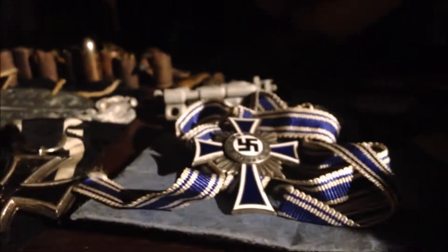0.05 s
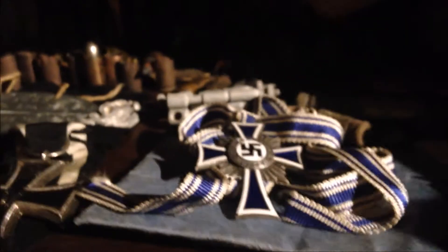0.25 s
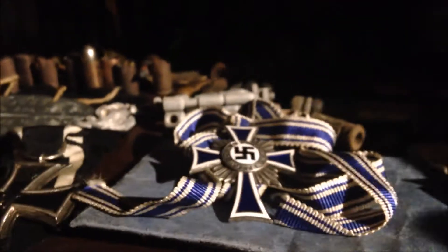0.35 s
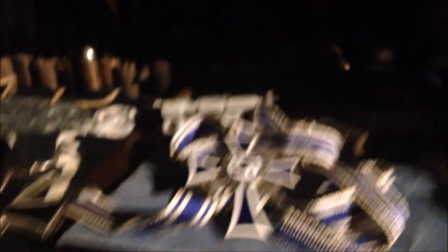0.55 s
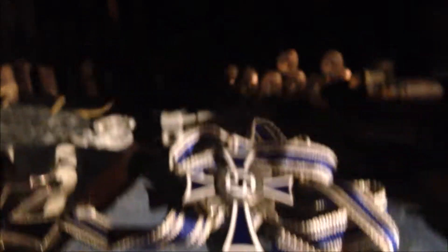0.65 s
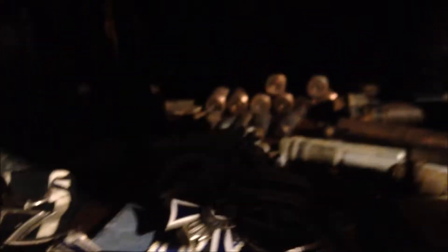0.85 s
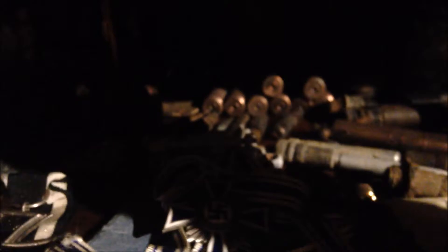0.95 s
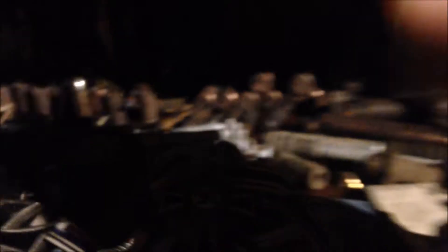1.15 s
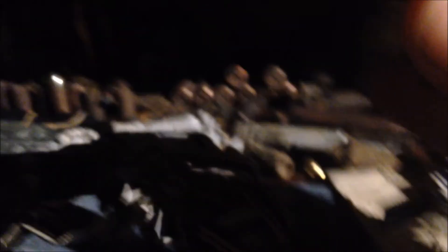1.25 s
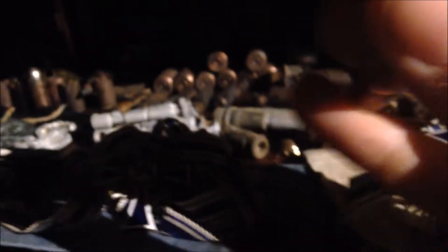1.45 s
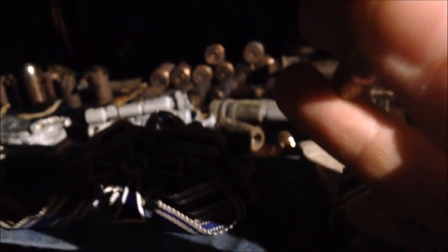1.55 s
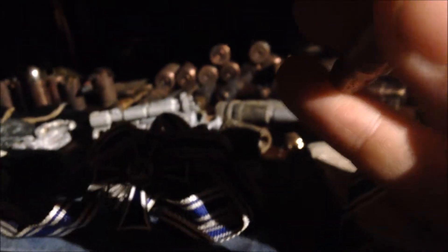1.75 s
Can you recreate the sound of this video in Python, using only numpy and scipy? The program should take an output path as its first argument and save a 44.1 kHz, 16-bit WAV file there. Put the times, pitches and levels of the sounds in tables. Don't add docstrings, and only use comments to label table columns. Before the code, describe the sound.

One sharp metallic clack opens a short dense clatter of thin casings on wood, dying quickly; afterwards only microphone hiss, low rumble, dull handling thuds and a couple of tiny ticks, close in a small room.

```python
import sys
import numpy as np
from scipy import signal
from scipy.fft import rfft, irfft
from scipy.io import wavfile
from scipy.ndimage import uniform_filter1d

SR = 44100
rng = np.random.default_rng(int(sys.argv[2]) if len(sys.argv) > 2 else 0)


def wav_out(sig):
    wavfile.write(sys.argv[1], SR, np.round(np.clip(np.atleast_2d(sig).T, -1, 1) * 32767).astype(np.int16))


def how_loud(loudness_db):
    steps = np.asarray(loudness_db, float) / 20
    return 10 ** steps


N = 79380

# t/s, clack level/dB, clack centre f/Hz, brass level/dB, table level/dB
KNOCK_EVENTS = [(.001, -59.5, 1000, -71, -29.5), (.046, -45.5, 3420, -58, -62.5),
                (.064, -46, 3260, -59.5, -53), (.096, -48.5, 2000, -38, -38.5),
                (.119, -45.5, 2400, -56, -48.5), (.155, -39, 2500, -40, -32.5),
                (.159, -20.5, 2300, -42, -37.5), (0.1627, -27, 2300, -50, -44.5),
                (.193, -38.5, 2000, -52.5, -42), (0.2036, -42, 4500, -28.5, -47),
                (.2185, -23, 2800, -49.5, -47.5), (0.219, -13.5, 2800, -51.5, -45.5),
                (0.2226, 0.5, 3530, -27, -15), (0.2234, 2.5, 3600, -30, -42.5),
                (0.2258, -11.5, 2212, -36.5, -25.5), (.230, -17, 3000, -21, -34),
                (.235, -22.5, 1900, -20, -35), (.249, -31, 2570, -42, -44), (.261, -21.5, 1700, -20.5, -43),
                (.290, -17.5, 2400, -18.5, -44.5), (.310, -16.5, 2400, -21.5, -40),
                (.326, -23, 1500, -24.5, -30.5), (.346, -57, 3600, -28, -68)]
# f/Hz, level/dB, t60/s
BRASS_MODES = [(6040, -8, .09), (6127, -7.5, .08), (6560, -19, 0.074), (7200, -17.5, 0.041),
               (7870, -15, 0.1), (8670, -23.5, .03), (9500, -25, .03), (10300, -20.5, .03),
               (10650, -9.5, .09), (11050, -9.5, .035), (13800, -17.5, .03), (14000, -14.5, .03),
               (14300, -12, .035), (14700, -14, .025)]
# f/Hz, level/dB, t60/s
CLACK_MODES = [(900, -10.5, 0.077), (1060, -4, 0.048), (1320, -5.5, 0.027), (1687, -10, 0.051),
               (1835, -9, 0.027), (2005, -5, 0.035), (2410, -4, .03), (2486, -2.5, .03), (2810, -8, .025),
               (3044, -10, 0.0093), (3414, -4.5, 0.009), (3660, -4.5, .02), (4360, -7, .016),
               (4940, -6.5, .012)]
# f/Hz, level/dB, t60/s
TABLE_MODES = [(190, -10, 0.13), (302.2, -3, 0.06), (360, -9, .05), (485.7, -0.5, 0.0703), (600, -5.5, .04),
               (755, -17, .025), (900, -7.5, .03)]
# t/s, metal effort level/dB, table drag level/dB
STIR_CURVE = [(0, -71, -41), (0.042, -67, -53.5), (.098, -51, -38), (.112, -52, -46), (.148, -58, -46),
              (.215, -37, -41.5), (0.224, -27, -38), (0.247, -36.5, -41), (0.282, -47.5, -50),
              (0.297, -38, -50), (.332, -42, -49), (0.339, -48, -53.5), (.378, -56, -59), (0.385, -75, -75)]
# t/s, peak level/dB, f/Hz, t60/s
BODY_BUMPS = [(.52, -54.5, 112.4, 0.098), (0.566, -53.5, 105.7, 0.06), (.833, -50, 210.4, 0.087),
              (.8915, -36.5, 85, .04), (.906, -43, 348, 0.028), (1.015, -60.5, 130, 0.074),
              (1.329, -55, 126, 0.056), (1.44, -45, 120, .05), (1.458, -33, 97, 0.04),
              (1.459, -39, 336, 0.018), (1.474, -46, 174.1, 0.042), (1.642, -62, 55.7, 0.1),
              (1.745, -51, 150.8, .06), (1.75, -61.5, 472.4, 0.21), (1.775, -53, 130.3, .12)]
# t/s, peak level/dB, f/Hz, t60/s
CASING_TICKS = [
    (.893, -52, 1180, 0.052),
    (.894, -51, 4350, .02),
    (.905, -58, 1173, 0.057),
    (.906, -56, 4280, 0.038),
    (1.567, -52, 2140, 0.031),
    (1.5685, -44, 4500, 0.014),
    (1.5683, -52.5, 4050, 0.05),
]
# f/Hz, density level/dB
HISS_SPECTRUM = [(18, -38.5), (30, -6.5), (192, -2), (214, -8), (351, -8), (592, -14.5), (675, -18.5),
                 (1030, -20.5), (15600, -20.5)]
# t/s, depth level/dB
HISS_DIPS = [
    (.417, -11),
    (0.971, -6),
    (1.758, -3.5),
]

CONTACT_RISE_S, THUD_RISE_S = .0001, .0004
MIC_NOTCH = signal.iirnotch(12400, 12400 / 1400, fs=SR)


def knocks():
    chatter_db, chatter_per_db, chatter_decay_s, chatter_share = -14, .4, .004, .12
    snap_db, snap_per_db, snap_t60_s = 5.5, .35, .0042
    crack_db, crack_decay_s, crack_top_hz = -16.5, .002, 4500
    out = np.zeros(N)
    chance = rng.standard_normal((len(KNOCK_EVENTS), 5, 800))
    dice = rng.random((len(KNOCK_EVENTS), 800))
    t = np.arange(800) / SR
    crack_filter = signal.butter(2, crack_top_hz, fs=SR)
    for (s, clack_db, hz, brass_db, table_db), c, d in zip(KNOCK_EVENTS, chance, dice):
        rebounds = (d < chatter_share) * c[4] * np.exp(-t / chatter_decay_s)
        chatter = how_loud(chatter_db - chatter_per_db * clack_db) * rebounds
        chatter[0] = 1
        chatter = chatter / np.sqrt(np.sum(chatter ** 2))

        clack = strike(focus(CLACK_MODES, hz, 7.5), c[0], CONTACT_RISE_S)
        snap = how_loud(snap_db + snap_per_db * clack_db) * rise(ring(hz, snap_t60_s), CONTACT_RISE_S)
        brass = how_loud(brass_db) * strike(BRASS_MODES, c[1], CONTACT_RISE_S)
        metal = how_loud(clack_db) / 2 * (clack + snap) + brass
        thud = how_loud(table_db) * strike(TABLE_MODES, c[2], THUD_RISE_S)
        crack = signal.lfilter(*crack_filter, c[3]) * np.exp(-t / crack_decay_s)

        add(out, s, signal.fftconvolve(metal, chatter))
        add(out, s, thud)
        add(out, s, how_loud(clack_db + crack_db) * crack)
    return out


def rattle():
    hits_per_s, hit_spread_db = 4500, 1.5
    grit_db, grit_top_hz = -7, 4500
    clack_db, brass_db, table_db = 4, -3.5, 2
    damp, table_damp = .8, .8 * .55
    wander_db, wander_s = 5, .018
    brass_exponent, full_effort_db = .43, -35.5

    t = np.arange(N) / SR
    curve = np.array(STIR_CURVE).T
    effort, drag = (how_loud(np.interp(t, curve[0], db, right=-120)) for db in curve[1:])
    struck = rng.random(N) < hits_per_s / SR
    hits = unit(struck * how_loud(hit_spread_db * rng.exponential(size=N)))
    grit = effort * hits * rng.standard_normal(N)
    out = how_loud(grit_db) * signal.lfilter(*signal.butter(1, grit_top_hz, fs=SR), grit)

    jingle = effort * (effort / how_loud(full_effort_db)) ** brass_exponent
    clack_modes = focus(CLACK_MODES, 2000, 5)
    bodies = ((clack_modes, clack_db, effort, damp),
              (BRASS_MODES, brass_db, jingle, damp),
              (TABLE_MODES, table_db, drag, table_damp))
    for modes, body_db, push, t60_factor in bodies:
        shapes = [how_loud(db) * ring(hz, t60 * t60_factor, .15) for hz, db, t60 in modes]
        norm = np.sqrt(sum(np.sum(h ** 2) for h in shapes))
        for h in shapes:
            sway = unit(how_loud(wander_db * wander(wander_s)))
            drive = push * hits * rng.standard_normal(N) * sway
            out = out + how_loud(body_db) / norm * signal.fftconvolve(drive, h)[:N]
    return out


def room(x):
    t60_s, ring_hz, ring_width_hz = .85, 2070, 300
    broad_db, broad_top_hz, wet_db = 5, 1700, -37
    t = np.arange(int(.6 * SR)) / SR
    band = signal.iirpeak(ring_hz, ring_hz / ring_width_hz, fs=SR)
    noise = rng.standard_normal((2, len(t)))
    mids = unit(signal.lfilter(*band, signal.lfilter(*band, noise[0])))
    broad = unit(signal.lfilter(*signal.butter(2, broad_top_hz, fs=SR), noise[1]))
    air = mids + how_loud(broad_db) * broad
    tail = rise(air * np.exp(-np.log(1000) * t / t60_s), .0061)
    return how_loud(wet_db) * signal.fftconvolve(x, tail / np.sqrt(np.sum(tail ** 2)))[:N]


def bumps():
    out = np.zeros(N)
    for s, db, hz, t60 in BODY_BUMPS:
        add(out, s, -how_loud(db) * rise(ring(hz, t60), .0017))
    for s, db, hz, t60 in CASING_TICKS:
        partials = sum(ring(hz * k, t60) for k in (1, 1.05, 1.11)) / 2
        add(out, s, how_loud(db) * rise(partials, .00038))
    return out


def hiss():
    level_db, rumble_top_hz, flicker_db, flicker_s, dip_s = -65.5, 700, 1.5, 1 / 40, .0049
    f = np.maximum(np.arange(N // 2 + 1) * SR / N, 1)
    hz, db = np.array(HISS_SPECTRUM).T
    shape = how_loud(np.interp(np.log(f), np.log(hz), db))
    low = 1 / (1 + (f / rumble_top_hz) ** 4)
    rumble, top = (irfft(rfft(rng.standard_normal(N)) * shape * np.sqrt(w), N) for w in (low, 1 - low))
    t = np.arange(N) / SR
    dip_db = sum(depth * np.exp(-((t - s) / dip_s) ** 2) for s, depth in HISS_DIPS)
    flicker = unit(how_loud(flicker_db * wander(flicker_s)))
    return how_loud(level_db) * unit(rumble * flicker + top * how_loud(dip_db))


def strike(modes, chance, rise_s):
    scatter_db, detune = 2.2, .006
    hz, db, t60 = np.array(modes, float).T
    k = len(hz)
    x = how_loud(db + scatter_db * chance[:k]) @ ring(hz * (1 + detune * chance[k:2 * k]), t60)
    return rise(x / np.abs(x).max(), rise_s)


def focus(modes, hz, db_per_oct2):
    return [(f, db - db_per_oct2 * np.log2(f / hz) ** 2, t60) for f, db, t60 in modes]


def ring(hz, t60, length_s=.3):
    t = np.arange(int(length_s * SR)) / SR
    decay = np.exp(-np.log(1000) * np.multiply.outer(1 / np.asarray(t60), t))
    return np.sin(2 * np.pi * np.multiply.outer(hz, t)) * decay


def rise(x, seconds):
    return x * (1 - np.exp(-np.arange(len(x)) / SR / seconds))


def wander(seconds):
    k = int(SR * seconds)
    return unit(uniform_filter1d(uniform_filter1d(rng.standard_normal(N), k), k))


def unit(x):
    return x / np.sqrt(np.mean(x ** 2))


def add(out, s, x):
    i = int(max(s, 0) * SR)
    out[i:i + len(x)] += x[:len(out) - i]


def scene():
    no_bass = signal.butter(3, 120, "high", fs=SR, output="sos")
    heap = signal.sosfilt(no_bass, knocks() + rattle())
    heap = heap + room(heap)
    heap = signal.lfilter(*MIC_NOTCH, signal.lfilter(*MIC_NOTCH, heap))
    return (heap + bumps() + hiss())[None]


def roll_off(x):
    return signal.sosfilt(signal.butter(12, 16110, fs=SR, output="sos"), x)


def record(dry):
    crowded_from_hz, crowded_db, crowded_s = 5000, -60, .025
    ceiling, top_hz = .97, 15550
    treble = signal.lfilter(*signal.butter(2, crowded_from_hz, "high", fs=SR), dry)
    busy = uniform_filter1d(np.abs(treble), int(crowded_s * SR)) / how_loud(crowded_db)
    crowded = np.clip(busy, 0, 1) ** 3
    notched = signal.filtfilt(*MIC_NOTCH, dry)
    limited = np.clip(dry + crowded * (notched - dry), -ceiling, ceiling)
    cut = signal.sosfilt(signal.ellip(8, .2, 60, top_hz, fs=SR, output="sos"), limited)
    return roll_off(cut)


dry = scene()
out = record(dry)
wav_out(out)
```